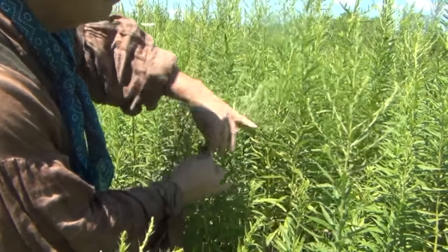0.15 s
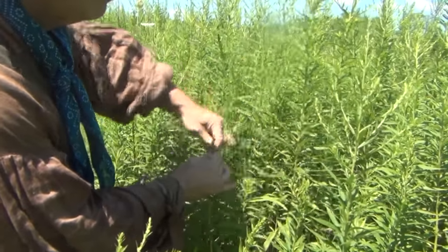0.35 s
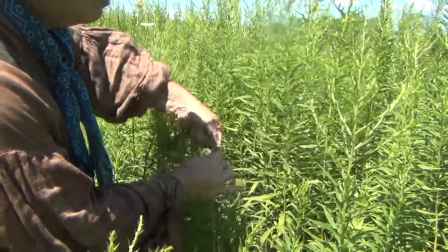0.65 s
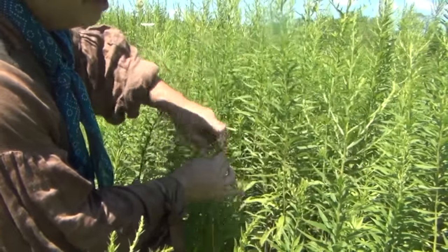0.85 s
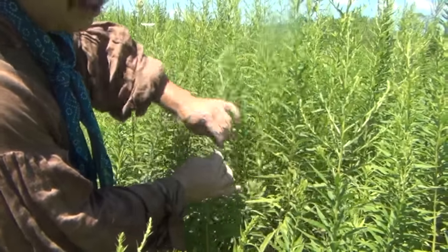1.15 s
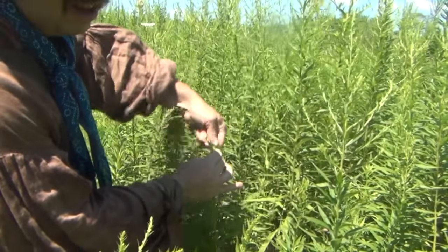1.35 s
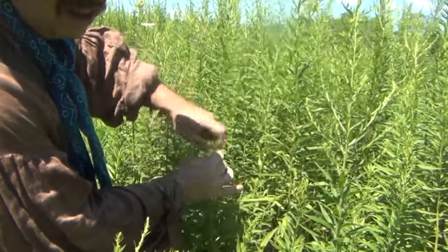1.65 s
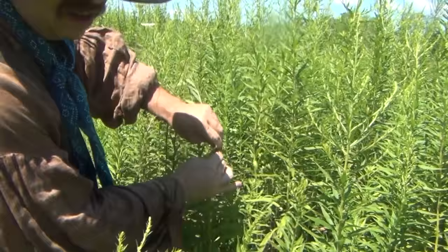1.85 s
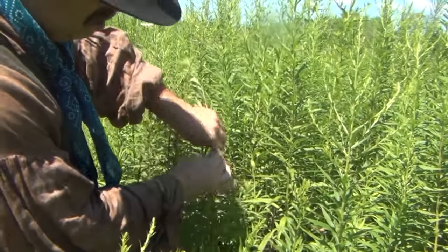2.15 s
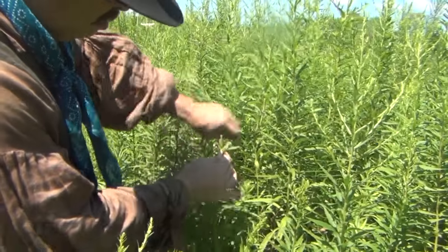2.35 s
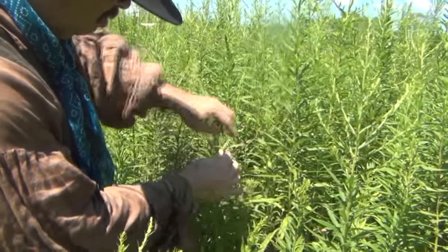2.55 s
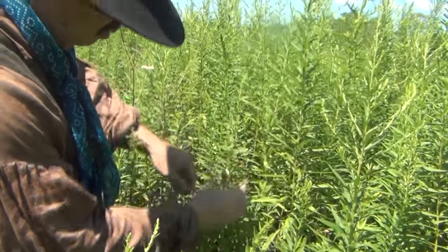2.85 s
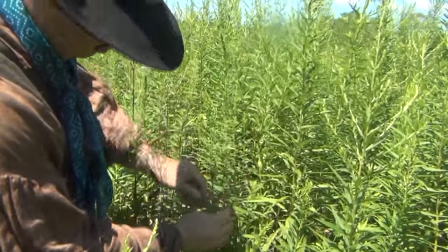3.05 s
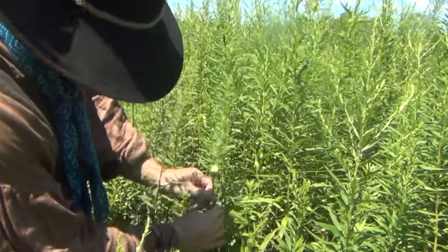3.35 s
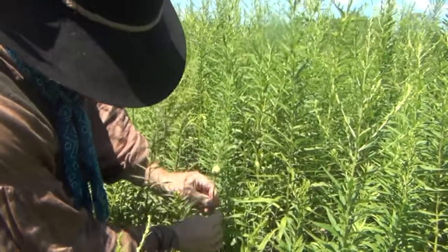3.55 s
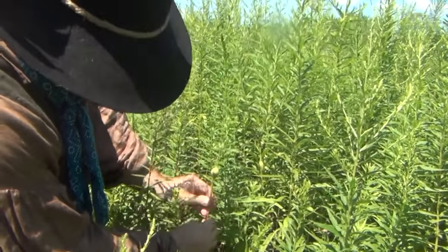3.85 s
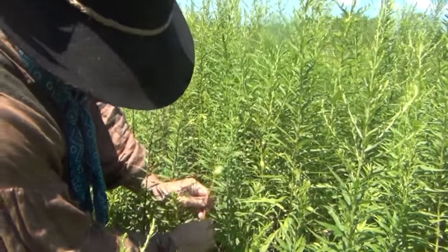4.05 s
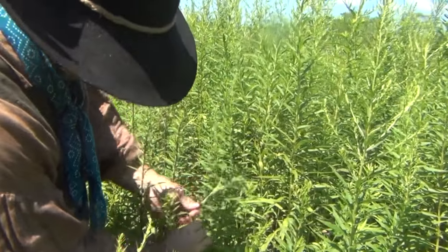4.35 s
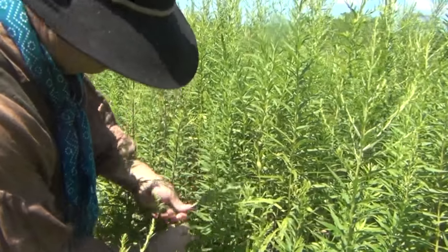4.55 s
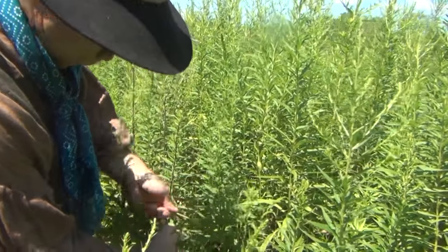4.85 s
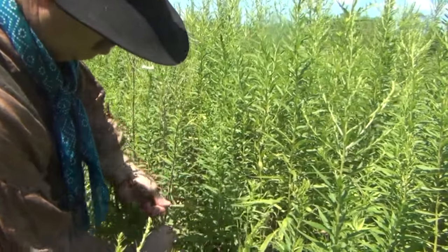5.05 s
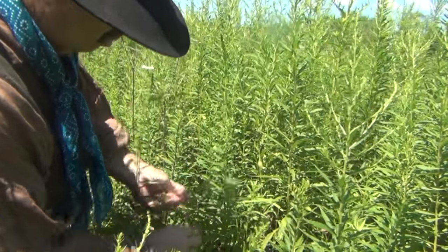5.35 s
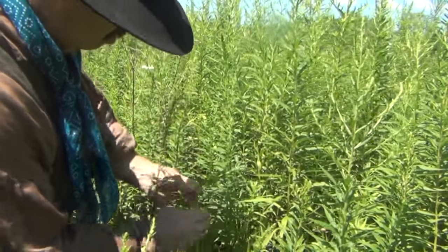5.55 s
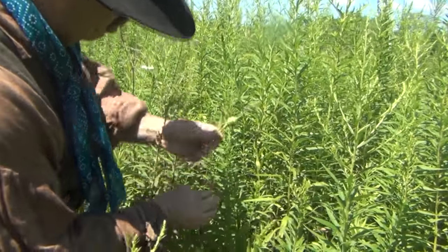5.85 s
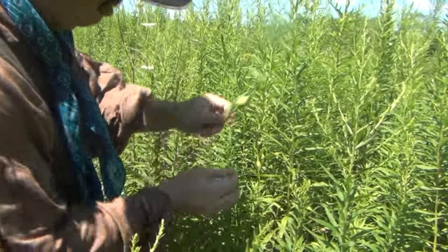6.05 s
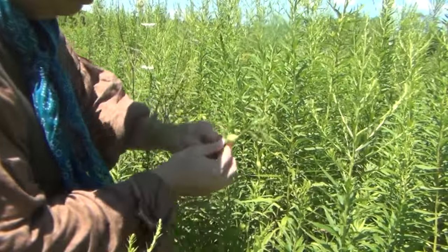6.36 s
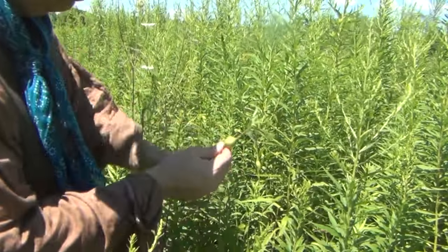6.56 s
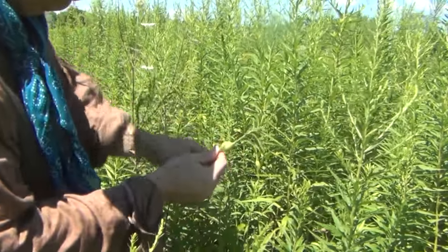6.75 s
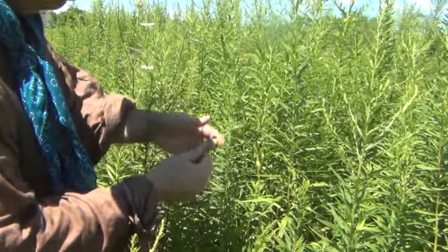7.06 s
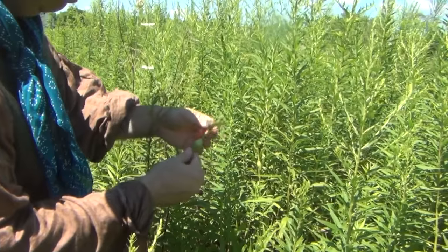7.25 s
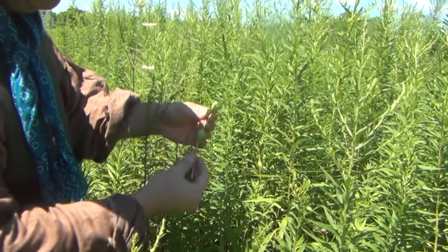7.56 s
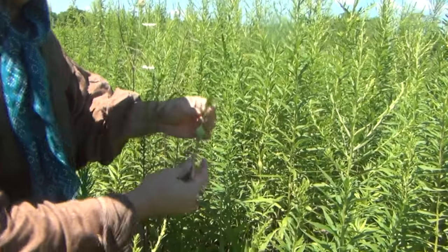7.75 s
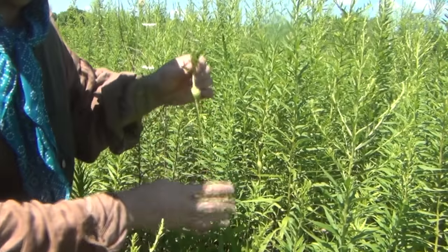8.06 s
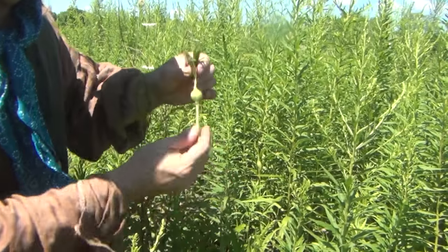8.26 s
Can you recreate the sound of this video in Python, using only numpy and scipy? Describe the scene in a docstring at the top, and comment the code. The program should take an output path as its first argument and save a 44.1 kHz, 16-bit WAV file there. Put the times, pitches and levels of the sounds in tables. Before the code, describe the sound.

Throughout, ground crickets trill very high, around 8 to 9 kHz, each giving about eighteen to twenty quick soft chirps a second, overlapping into an uneven shimmer; another joins around 0.8 s and one more by 2.3 s. Beneath are steady air hiss, distant low rumble with windy swells near 4.3 to 5 s, and a faint fast camera rattle with a thin whine. Hands brush leaves from 0 s with dry crackles and small snaps, softer from 1 to 2 s. A sharp cluster of cracks bursts at 2.24 s, then gentler rustling. Snaps thicken around 4.8 to 4.9 s, and the hardest break hits at 5.75 s with a short low ring. After 6 s only sparse ticks and light brushes remain, with small clicks near 6.6, 7.9 and 8.2 s. A faint distant bird warbles from 7.7 to 8.2 s. Dry, open air; right channel only, left silent.

```python
"""From the start four ground crickets trill in a weedy field, each wing stroke an arching near sine.
Under them lie filtered noise as air hiss and far rumble, and a camera whose tape drum ticks and circuits whine.
Hands brush leaves (crackling noise) and snap stems (clicks and splintering); two more crickets join by 2.3 s.
The hardest breaks, near 5.75 s, come with a short low ring; near 7.7 s a far bird warbles, a narrow band of noise.
Only the right input is connected, so the left side is silent."""
import sys
import numpy as np
from scipy import signal
from scipy.io import wavfile
from scipy.ndimage import uniform_filter1d

SR = 44100
rng = np.random.default_rng(int(sys.argv[2]) if len(sys.argv) > 2 else 0)


def generate_wav(sig):
    """Save sig (samples, or channels by samples) to the path in sys.argv[1] as 16-bit PCM at SR."""
    pcm = np.round(np.clip(np.atleast_2d(sig).T, -1, 1) * 32767).astype(np.int16)
    wavfile.write(sys.argv[1], SR, pcm)


N = 369999  # length in samples, about 8.4 s
# All levels in dB below come before the gain of the preamplifier.


def amp(db):
    """Turns decibels into a gain."""
    return 10 ** (np.asarray(db) / 20)


def evened(x):
    """Scales a sound to an rms of 1."""
    return x / np.sqrt(np.mean(x ** 2) + 1e-20)


def curve(table, column):
    """Draws straight lines through one column of a table, sample by sample; column 0 is the time."""
    return np.interp(np.arange(N) / SR, [row[0] for row in table], [row[column] for row in table])


def coloured(x, points):
    """Causal filter whose tone follows the points; its impulse response has energy 1, so only their shape counts."""
    hz, db = np.transpose(points)
    log_hz = np.log(abs(np.fft.fftfreq(8192, 1 / SR)) + 1)
    gain_db = np.interp(log_hz, np.log(hz), db, left=db[0] - 19.5, right=db[-1] - 21)
    log_gain = np.log(amp(gain_db))
    # minimum phase: the filter answers as early as it can
    taps = np.fft.ifft(np.exp(np.conj(signal.hilbert(log_gain)))).real[:4096]
    return signal.oaconvolve(x, taps / np.linalg.norm(taps))[:N]


def drift(size):
    """Random wandering of rms 1: noise averaged twice over this many samples."""
    return evened(uniform_filter1d(uniform_filter1d(rng.standard_normal(N), size), size))


def whistle(hz, width_hz):
    """Noise narrowed around a moving pitch, with an rms of 1."""
    r = np.exp(-np.pi * width_hz / SR)
    noise = rng.standard_normal(N) + 1j * rng.standard_normal(N)
    slow = signal.lfilter([1], [1, -2 * r, r * r], noise)
    return evened((slow * np.exp(2j * np.pi * np.cumsum(hz) / SR)).real)


# The shape of one wing stroke, before each cricket stretches and bends it.
# Each row: time from the middle of the stroke in ms, pitch bend in Hz, level in dB over the effort.
STROKE_SHAPE = [(-11.5, -260, -40), (-9, -110, -1.5), (-2.5, -1.5, -1), (1.5, -30, 1.5), (5, -300, -2),
                (9, -750, -9), (11, -850, -34)]
ROW_STROKES = 10  # wing strokes from one tempo time to the next
REST_DB, REST_FADE_S = -16, .15  # how far a rest lowers the level, and how long the change takes
WAVER_DB = 0.74  # slow unevenness from stroke to stroke


def cricket(tempo, trill, rests, hz, stretch, bend):
    """Each wing stroke is a near sine that arches up and drops away; no two are quite alike."""
    t = np.arange(N) / SR
    count = ROW_STROKES * np.arange(len(tempo))
    when = np.interp(np.arange(count[-1] + 1), count, tempo)
    chance = rng.standard_normal((len(when), 4))
    late_ms, off_hz, off_db, waver = (chance * [.3, 12, 1.2, 2]).T
    effort_db = np.interp(when, *np.transpose(trill)) + off_db + WAVER_DB * uniform_filter1d(waver, size=4)
    for start, end in rests:
        inside_s = np.minimum(when - start, end - when)
        effort_db = effort_db + REST_DB * np.clip(inside_s / REST_FADE_S + .5, 0, 1)
    stroke = np.round(np.interp(t, tempo, count)).astype(int)  # the nearest stroke
    ms = (1000 * (t - when[stroke]) - late_ms[stroke]) / stretch
    at, bend_hz, db = np.transpose(STROKE_SHAPE)
    pitch = uniform_filter1d(hz + off_hz[stroke] + bend * np.interp(ms, at, bend_hz), size=60)
    level_db = effort_db[stroke] + np.interp(ms, at, db, left=-99, right=-99)
    level = uniform_filter1d(amp(level_db), size=60)
    rough = 1 + 0.051 * drift(size=40)
    return np.sqrt(2) * level * rough * np.sin(2 * np.pi * np.cumsum(pitch) / SR)


# Tempo, one list for each cricket: the time in seconds of every tenth wing stroke.
TEMPO_TIMES = [
    [-.018, .495, 1.004, 1.517, 2.031, 2.546, 3.05, 3.556, 4.066, 4.573, 5.082, 5.599, 6.104, 6.608, 7.115,
     7.628, 8.144, 8.658],
    [-.015, .499, 1.004, 1.513, 2.031, 2.548, 3.061, 3.569, 4.078, 4.591, 5.102, 5.611],
    [-.016, .476, .971, 1.467, 1.961, 2.445, 2.934, 3.431, 3.926, 4.418, 4.912, 5.405, 5.904, 6.403, 6.894,
     7.381, 7.873, 8.354, 8.846],
    [-.021, .515, 1.063, 1.61, 2.154, 2.697, 3.236, 3.785, 4.331, 4.874, 5.416, 5.959, 6.502, 7.05, 7.594,
     8.142, 8.685],
    [.837, 1.409, 1.981, 2.548, 3.118, 3.686, 4.238, 4.792, 5.348, 5.927, 6.505, 7.067, 7.624, 8.185, 8.741],
    [2.26, 2.829, 3.4, 3.958, 4.521, 5.091, 5.655, 6.22, 6.783, 7.342, 7.901, 8.461],
]
# Effort, one list for each cricket. Each row: time in seconds, level in dB.
TRILL_LEVELS = [
    [(0, -41), (.6, -42.5), (1.8, -41.5), (2.3, -49), (3.3, -39.5), (4.3, -42.5), (4.7, -39), (5.4, -41),
     (6.6, -46.5), (7.1, -43.5), (8.4, -44)],
    [(0, -34.5), (1, -36.5), (2.2, -36.5), (3.1, -40.5), (3.6, -37.5), (5.1, -37.5)],
    [(0, -42), (.5, -32), (1, -39), (2.3, -38.5), (3.2, -46), (4.3, -34), (4.9, -41.5), (5.2, -34.5),
     (6.7, -41.5), (7.9, -43.5), (8.15, -38), (8.4, -44)],
    [(0, -39), (1.6, -42.5), (2.7, -41), (3.8, -40), (4.4, -39.5), (5.4, -37.5), (6.3, -40), (7.3, -44.5),
     (7.9, -40), (8.4, -38.5)],
    [(.8, -58), (1.1, -51), (1.7, -53), (2.3, -48), (3.6, -53.5), (4.9, -47.5), (6.3, -48), (7.9, -62),
     (8.4, -50)],
    [(2.3, -51), (2.85, -41), (3.45, -55), (4.25, -39.5), (5.4, -55), (6.3, -46), (7.4, -43), (7.9, -45),
     (8.4, -43)],
]
# When a cricket grows quieter, one list for each. Each row: start in seconds, end in seconds.
# A row that ends before it starts does nothing.
REST_TIMES = [
    [(2.42, 2.85)],
    [(2.4, 2.76), (5.2, 9.2)],
    [(1.05, 1.97), (5.55, 6.55), (7.5, 7.6)],
    [(2, .12), (5, 3.6)],
    [],
    [],
]
# One row for each cricket: wing pitch in Hz, stroke length as a factor, pitch bend as a factor.
WING_SHAPES = [(8985, .8, .75), (8430, 1.01, 0.78), (8750, 0.76, 0.95), (8670, 1.1, 1.03),
               (7930, 1.1, 0.63), (8260, .95, .7)]
# Tone of the farthest crickets. Each row: frequency in Hz, relative level in dB per Hz.
CHORUS_TONE = [(6900, -41.5), (7500, -10), (8100, -5.5), (8550, -14.5), (9000, -3.5), (9400, -17),
               (9900, -73)]
CHORUS_DB = -53
FAR_SINGERS_DB = -51.5  # middle effort of each distant cricket still heard stroke by stroke


def crickets():
    """Near and distant singers scatter off the weeds; the farthest merge into a shimmering band."""
    singers = zip(TEMPO_TIMES, TRILL_LEVELS, REST_TIMES, WING_SHAPES)
    song = sum(cricket(tempo, trill, rests, *wing) for tempo, trill, rests, wing in singers)
    strokes_per_s, starts = rng.uniform(17.5, 20.5, 6), rng.random(6)
    for hz, per_s, start in zip(np.linspace(8300, 8850, 6), strokes_per_s, starts):
        tempo = ROW_STROKES * (np.arange(20) - start) / per_s
        effort_db = FAR_SINGERS_DB + 4.0 * rng.standard_normal(len(tempo))
        song += cricket(tempo, np.transpose([tempo, effort_db]), [], hz, stretch=1.05, bend=.8)
    t = np.arange(4000) / SR
    weeds = rng.standard_normal(len(t)) * amp(-60 * t / 0.0095) * (t > .002)  # short dense echo
    scattered = signal.oaconvolve(song, weeds / np.linalg.norm(weeds))[:N]
    chorus = coloured(rng.standard_normal(N), CHORUS_TONE) * amp(CHORUS_DB + 1.6 * drift(size=300))
    return song + amp(-15) * scattered + chorus


# Tone of the air hiss. Each row: frequency in Hz, relative level in dB per Hz.
AIR_TONE = [(250, -9), (363, -8), (531, -13), (796, -12.5), (2000, -20), (3000, -23), (6700, -24.5),
            (9600, -25.5), (16000, -35.5)]
AIR_DB = -49.5
# Far rumble. Each row: time in seconds, then levels in dB of the wind (under 100 Hz),
# the drone (100 to 250 Hz) and the roar (500 to 900 Hz).
RUMBLE_LEVELS = [(0, -57, -47.5, -68), (.5, -60, -49, -60), (.9, -63, -48, -56), (1.12, -59, -45, -62),
                 (1.55, -58, -49, -63), (2.0, -57, -46.5, -66), (2.35, -56, -46.5, -58.5),
                 (3.2, -62, -43, -53.5), (3.55, -50, -46.5, -55.5), (3.95, -52.5, -45.5, -57),
                 (4.28, -42, -45.5, -53.5), (4.55, -51, -46.5, -52.5), (4.68, -43, -48, -52.5),
                 (4.98, -44, -44, -54.5), (5.15, -52, -48.5, -57.5), (5.8, -54, -49, -53.5),
                 (6.8, -54, -49.5, -55.5), (7.3, -52.5, -46.5, -60), (7.6, -54.5, -45, -59),
                 (8.39, -54, -44, -60)]
# Tone of wind, drone and roar, one list each. Each row: frequency in Hz, relative level in dB per Hz.
RUMBLE_TONES = [
    [(20, -39), (35, -2), (55, 2), (90, 2.5), (130, -28)],
    [(80, -26), (110, -4.5), (135, -4.5), (200, -4), (300, -14.5)],
    [(400, -20.5), (560, -7.5), (680, -4), (850, -10), (1200, -16)],
]
# The hum inside the drone. Each row: time in seconds, middle pitch in Hz.
HUM_PITCH = [(0, 150), (1, 111.2), (1.4, 137.3), (2.3, 182.6), (2.8, 140), (3.4, 164.1), (4.5, 140),
             (5.6, 130.7), (7.4, 130.9), (8.39, 150.7)]
# How much wind, drone and roar waver: one rms value in dB for each.
GUST_SIZES = (3.5, 1.5, 2.5)


def background():
    """Steady air hiss and three slowly swelling far rumbles; the drone is part noise, part wandering hum."""
    out = coloured(rng.standard_normal(N), AIR_TONE) * amp(AIR_DB + 0.88 * drift(size=2000))
    wind, drone, roar = (coloured(rng.standard_normal(N), tone) for tone in RUMBLE_TONES)
    hum = whistle(curve(HUM_PITCH, column=1), width_hz=46)
    drone = amp(-3) * drone + amp(-5.5) * hum
    for k, part in enumerate([wind, drone, roar]):
        out += part * amp(curve(RUMBLE_LEVELS, column=k + 1) + GUST_SIZES[k] * drift(size=4000))
    return out


# What rings once a drum turn. Each row: pitch in Hz, delay into the turn in ms,
# level in dB before the soft onset, time in seconds to fall by 60 dB.
DRUM_RINGS = [(1362, 27, -45, 0.021), (1575, 28, -48, 0.025), (2502, 27.5, -50, 0.026),
              (2622, 30, -44.5, 0.02), (2803, 31, -52, 0.062), (5160, 25.3, -49.5, 0.025)]
DRUM_HZ = 30000 / 1001  # turns per second
WHINE_HZ, WHINE_DB = 15734, -75


def camera():
    """The drum repeats a small rattle every turn, its sign flipped on every other turn; circuits whine faintly."""
    t, out = np.arange(N) / SR, np.zeros(N)
    turns = np.arange(round(N / SR * DRUM_HZ) + 3)
    for hz, ms, db, t60 in DRUM_RINGS:
        turn, since = np.divmod(t - ms / 1000 + 1 / DRUM_HZ, 1 / DRUM_HZ)
        blows = (-1) ** (turns % 2) * amp(2.5 * rng.standard_normal(len(turns)))
        fade = amp(db - 60 * since / t60)
        onset = 1 - np.exp(-since / 0.0019)
        out += blows[turn.astype(int)] * fade * onset * np.sin(2 * np.pi * hz * since)
    return out + np.sqrt(2) * amp(WHINE_DB) * np.sin(2 * np.pi * WHINE_HZ * t)


# Leaves brushed by the hands. Each row: peak time in seconds, peak level in dB, swell in seconds,
# fade in seconds, level of the low hump in dB against the high one (more is duller),
# level of the body hump in dB against the high one (more is weightier).
BRUSH_STROKES = [(.069, -40.5, .1, .11, -6, -18), (.173, -44, .1, .13, -9, -19),
                 (.36, -40.5, 0.4, 0.31, -2.5, -14), (.55, -44.5, 0.71, 0.98, -3.5, -11.5),
                 (1.007, -44.5, 0.39, 0.12, 1, -9), (1.12, -43, 0.17, 0.14, -1, -9.5),
                 (1.36, -47.5, 0.27, .5, -2, -18), (1.51, -48.5, .4, .1, 1.5, -5),
                 (1.68, -45.5, 0.17, .2, -2.5, -10), (1.8, -44, 0.11, .07, -5, -9),
                 (1.923, -46, .04, .13, -5.5, -16), (2.12, -55, .14, .2, -6, -20),
                 (2.245, -30.5, 0.022, 0.1, -2.5, -19), (2.325, -32.5, 0.19, .06, -9.5, -16.5),
                 (2.405, -42.5, .12, .08, -3, -17), (2.47, -50.5, .2, .4, 0, -15),
                 (2.75, -46.5, 0.31, .8, -10, -17), (3.1, -44, 0.79, 0.29, -2, -6.5),
                 (3.281, -47, .07, .04, -2, -8), (3.35, -50, 0.043, .09, -3, -5),
                 (3.558, -50, 0.11, .09, -5, -9), (3.797, -42.5, .045, .2, -5.5, -14),
                 (3.909, -44.5, 0.053, 0.092, -10, -20), (4.049, -40.5, 0.027, .04, -20, -25),
                 (4.141, -55, .1, .1, -7, -14), (4.277, -45.5, .13, .7, -8.5, -17),
                 (4.6, -44, .15, 0.13, -3, -4.5), (4.687, -41, 0.33, .09, -5.5, -7),
                 (4.85, -40, .07, 0.18, -6, -13), (4.899, -35, .1, .09, -8, -12),
                 (5.066, -45.5, 0.18, 0.11, -4, -7), (5.27, -42, 0.047, 0.24, -0.5, -5.5),
                 (5.32, -50.5, .1, 0.061, 4, 4), (5.376, -49, .1, .1, -5, -18),
                 (5.429, -48, 0.05, .16, -6, -3.5), (5.55, -40.5, .15, .07, -2, -18),
                 (5.678, -41.5, 0.073, .1, -4, -14), (5.762, -27, 0.024, 0.11, -5.5, -13),
                 (5.88, -47.5, .2, .3, -8, -13), (6.249, -46, .04, .025, -11, -22),
                 (6.55, -45, .055, .1, -19, -21), (6.615, -44, 0.099, .025, -10, -21),
                 (6.668, -43.5, .04, .025, -9, -20), (6.911, -48, .03, .035, -10, -17),
                 (7.691, -58, .1, .15, -8, -9), (7.83, -67, .3, 0.44, 11.5, 8),
                 (7.903, -53, .04, .04, 1, -8), (8.051, -49, .035, .03, -10, -20),
                 (8.209, -50, .015, .02, -12, -14), (8.244, -59, .05, .2, -6, -11)]
BRUSH_SLOPE_DB = 21.5  # level lost over one swell or fade time
# Steady faint noise under the brushing: the level in dB of the high, low and body humps.
FLOOR_LEVELS = (-68, -66, -69.5)


def brushing():
    """Level of the high, low and body humps: each brush swells to its peak and fades; their powers add."""
    t = np.arange(0, N + 64, 64) / SR  # every 64th sample is enough
    power = amp(FLOOR_LEVELS)[:, None] ** 2
    for s, db, swell, fade, dull_db, weight_db in BRUSH_STROKES:
        shape_db = db - BRUSH_SLOPE_DB * np.maximum((s - t) / swell, (t - s) / fade)
        power = power + amp(shape_db + [[0], [dull_db], [weight_db]]) ** 2
    return np.array([np.interp(np.arange(N) / SR, t, np.sqrt(row)) for row in power])


# The two tones heard in brushing and breaks. Each row: frequency in Hz, relative level in dB per Hz.
HIGH_TONE = [(6900, -5.5), (7800, -26), (9300, 0.5), (10500, 5.5), (11500, 4.5), (13000, -3.5),
             (15500, -10), (18000, 1)]
LOW_TONE = [(1500, -23), (2900, -14.5), (3800, -9.5), (5000, -6), (6200, -0.5), (7300, -9), (8300, -20)]


def plant(drive):
    """The brushing and breaks are heard in two humps, one high and one low."""
    return coloured(drive[0], HIGH_TONE) + coloured(drive[1], LOW_TONE)


# The body tone of the rustle. Each row: frequency in Hz, relative level in dB per Hz.
BODY_TONE = [(500, -45), (1100, -7), (1700, -3), (2500, -1.5), (3300, -0.5), (4500, -28.5)]


def rustle(level):
    """Hiss in clumps with small crackles of very unequal size."""
    own_db = [1.34 * drift(size=90) + 2.1 * drift(size=400) for hump in range(3)]
    clumps = amp(own_db + 1.6 * drift(size=120))  # the last drift is shared by all humps
    size = amp(4.1 * np.minimum(rng.exponential(1, N), 3.5))
    size = size * (rng.random(N) < 500 / SR)  # about 500 crackles a second
    hiss = rng.standard_normal((3, N))
    crackles = 0.28 * evened(size) * rng.standard_normal((3, N))
    drive = level * evened(clumps * (hiss + crackles))
    return plant(drive) + coloured(drive[2], BODY_TONE)


# Stems and leaves breaking. Each row: time in seconds, strength of the crack in dB,
# drive of the low hump in dB against the high one (more is duller).
BREAKS = [(.0737, -9, -25), (.1695, -17, -13), (.4193, -12, -7), (.4409, -11.5, -8), (.4703, -17, -22),
          (.5688, -14, -20), (.6115, -11, -3.5), (.8761, -15.5, -7), (1.2522, -32, 10), (1.2754, -27.5, 8),
          (1.3487, -17, -3), (1.3498, -17.5, -15), (1.3923, -10, -13), (1.509, -22, -3),
          (1.7108, -22.5, -7), (1.7988, -20, -11), (1.9094, -27, -9), (1.9787, -21, -11), (2.22, -14, -2),
          (2.2388, -1, -5.5), (2.2417, -6, -13), (2.2438, -6.5, -3), (2.258, -8, 6.5), (2.2909, -8, -8),
          (2.3357, -16, -5), (2.3802, -16.5, -6), (2.4008, -19.5, 2), (2.5066, -18.5, -19),
          (3.069, -19.5, 1), (3.1333, -16, -8), (3.8005, -17, -12), (4.276, -22, -2), (4.304, -18, -6),
          (4.711, -17, -1), (4.8263, -10.5, -17), (4.8481, -12.5, -18), (4.865, -6, -16),
          (4.8993, -10.5, -16), (4.901, -4, -18), (5.0938, -16, -1.5), (5.1137, -17.5, -10),
          (5.4239, -9.5, -7.5), (5.4281, -19, -9), (5.438, -17.5, -15), (5.5038, -17.5, -1),
          (5.6011, -19, -8), (5.675, -11.5, -1.5), (5.6773, -14, -15), (5.6948, -10, -18),
          (5.734, -23.5, 2), (5.752, 7.5, -8), (5.7564, -13, -7), (5.765, 2, -15), (5.7666, -12.5, -8),
          (5.896, -18, -11), (5.9091, -23, 2.5), (6.5529, -16, -19), (6.619, -10, -9.5), (6.8163, -24.5, 2),
          (7.79, -32, 6), (7.8994, -12, -6), (8.1755, -22, -14)]
# Tone of the shaken stalk. Each row: frequency in Hz, relative level in dB per Hz.
STALK_TONE = [(150, -18), (300, 6.5), (800, -9), (1800, 4), (3200, -16), (5000, -29)]
STALK_DB = -18  # drive of the stalk against the low hump


def snaps(rows):
    """A sharp crack, then a few ms of splintering; each break also shakes the stalk, as hard as it drives the
    low hump."""
    drive, t = np.zeros((3, N + 900)), np.arange(900) / SR
    for (s, db, dull_db), chance in zip(rows, rng.standard_normal((len(rows), 900))):
        splinters = 0.13 * chance * amp(-60 * t / 0.011)
        crack = (t == 0) + splinters
        # a short echo notches its colour, a little differently for each break
        crack += 0.28 * np.roll(crack, 3 + int(12 * abs(chance[0])))
        at = round((s - .0002) * SR)
        drive[:, at:at + 900] += crack * amp([[db], [db + dull_db], [db + dull_db + STALK_DB]])
    return plant(drive[:, :N]) + coloured(drive[2, :N], STALK_TONE)


TICKS = 320  # how many small breaks
TICK_OVER_RUSTLE_DB, TICK_SPREAD_DB = 17, 4.5  # strength over the brushing level, and its chance spread
TICK_DULL_DB = -8.5  # middle drive of the low hump against the high one


def ticks(level):
    """Small breaks at random moments, stronger where the brushing is louder, as rows for the snaps."""
    when = rng.random(TICKS) * (N - 99) + 20  # in samples
    loud, dull = rng.standard_normal((TICKS, 2)).T
    brushing_db = 20 * np.log10(level[0, when.astype(int)])
    db = brushing_db + TICK_OVER_RUSTLE_DB + TICK_SPREAD_DB * loud
    return list(zip(when / SR, db, TICK_DULL_DB + 6.1 * dull))


# A stalk springs back. Each row: time in seconds, level in dB before the soft onset,
# pitch in Hz, time in seconds to fall by 60 dB.
STALK_THUDS = [(5.753, -28.5, 215, 0.094)]


def thud():
    """A short low ring: a sine that starts softly and dies away."""
    out = np.zeros(N)
    for s, db, hz, t60 in STALK_THUDS:
        since = np.maximum(np.arange(N) / SR - s, 0)
        onset = 1 - np.exp(-since / 0.0035)
        out += amp(db - 60 * since / t60) * onset * np.sin(2 * np.pi * hz * since)
    return out


# Far warble. Each row: time in seconds, pitch in Hz, level in dB.
WARBLE = [(7.66, 3215, -72), (7.74, 3220, -66), (7.82, 3350, -63), (7.87, 3200, -63), (7.92, 3370, -59),
          (7.98, 3190, -57), (8.05, 3350, -64), (8.08, 3257, -70), (8.13, 3380, -61), (8.2, 3300, -74)]


def bird():
    """A faint, slightly fuzzy whistle: narrow noise that follows the warble's pitch."""
    t = np.arange(N) / SR
    singing = (t > WARBLE[0][0]) * (t < WARBLE[-1][0])
    return whistle(curve(WARBLE, column=1), width_hz=110) * amp(curve(WARBLE, column=2)) * singing


def scene():
    """One microphone, on the right input; all sources add up in it."""
    level = brushing()
    plants = rustle(level) + snaps(ticks(level) + BREAKS) + thud()
    heard = crickets() + background() + camera() + plants + bird()
    return np.array([np.zeros(N), heard])


EDGE_HZ = 15830  # upper limit of the band


def record(dry):
    """Preamplifier gain of 2, hard ceiling, band limit, and the ceiling once more."""
    loud = np.clip(2 * dry, -1, 1)
    low_pass = signal.firwin(511, EDGE_HZ, window=("kaiser", 9), fs=SR)
    return np.clip(signal.oaconvolve(loud, low_pass[None], "same"), -1, 1)


dry = scene()
out = record(dry)
generate_wav(out)
```